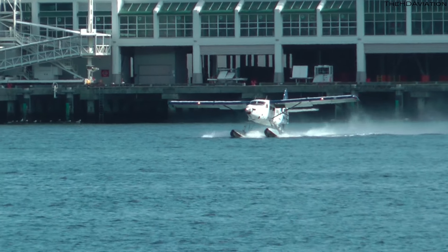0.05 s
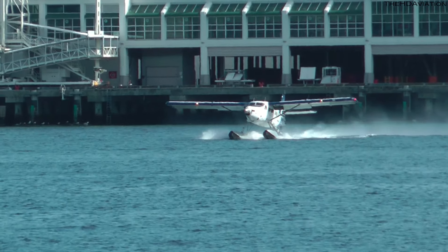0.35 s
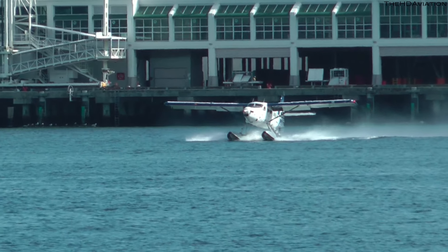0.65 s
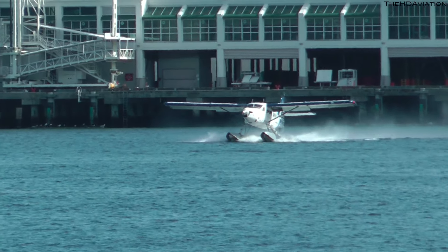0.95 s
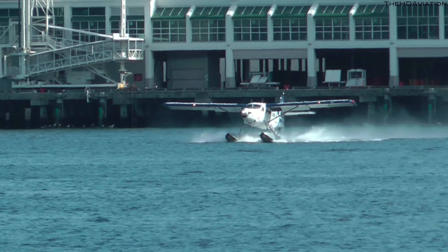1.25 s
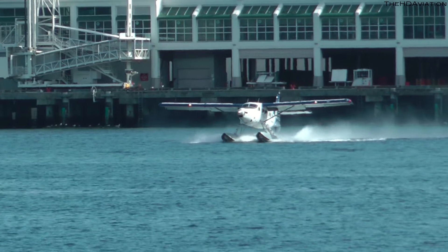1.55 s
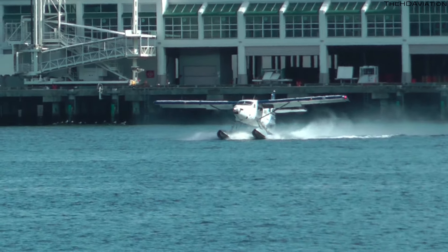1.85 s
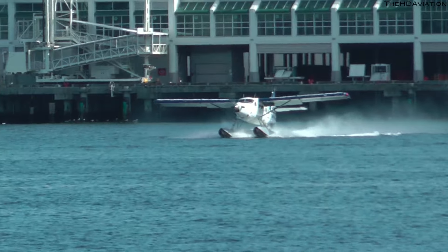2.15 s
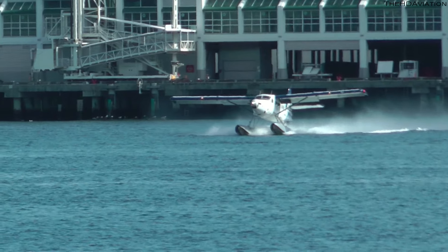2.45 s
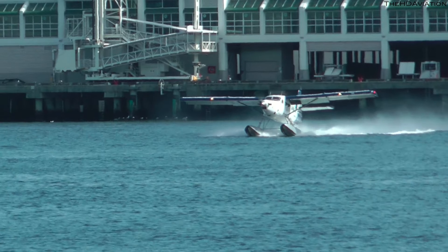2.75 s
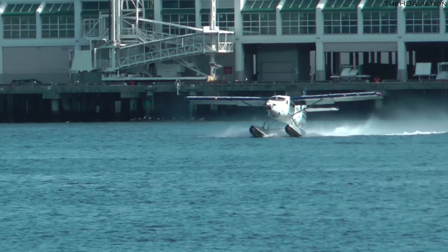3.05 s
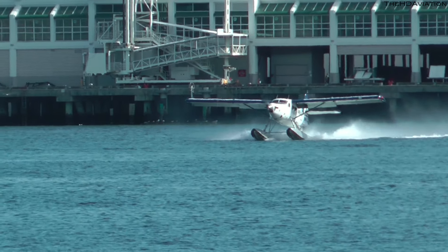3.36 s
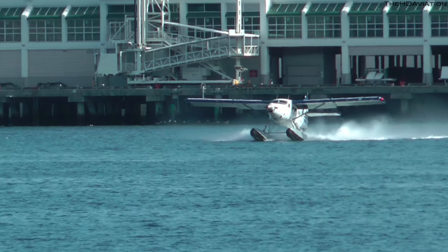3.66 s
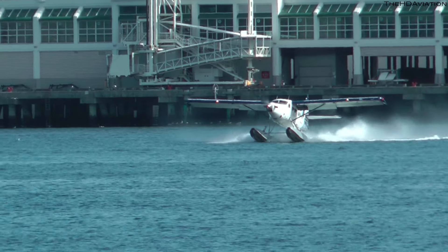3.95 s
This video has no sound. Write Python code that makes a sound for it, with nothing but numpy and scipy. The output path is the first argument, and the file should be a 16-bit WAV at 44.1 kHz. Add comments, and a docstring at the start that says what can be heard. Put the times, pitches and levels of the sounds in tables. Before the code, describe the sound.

A floatplane's propeller drones over a throbbing exhaust rumble throughout, far off and slightly right, with hissing spray, faint fizzing ripples and a low harbour hum. Light handling ticks touch the microphone now and then, the sharpest at about 0.8 seconds. From 1 to 3 seconds the drone wavers and sinks slightly in pitch. From 3 to 4 seconds a high engine whine and the spray grow louder.

```python
"""A floatplane runs across a harbour at take-off power, far off and a little to the right.
From the start its propeller drones over a throbbing exhaust, and the quay sends back a slightly higher
echo; spray hisses, ripples fizz and harbour machines hum. A camera ticks now and then, loudest at 0.8 s.
Through the middle the drone sinks a little in pitch, while its tones swell and fade in turn.
In the last second the engine's whine and the spray grow as the plane nears."""
import sys
import numpy as np
from scipy import signal
from scipy.fft import rfft, irfft
from scipy.io import wavfile

SR = 44100
rng = np.random.default_rng(int(sys.argv[2]) if len(sys.argv) > 2 else 0)


def dump_mix(stems):
    """Bounce the given channels to the path in sys.argv[1] as a 16-bit WAV at rate SR."""
    frames = np.atleast_2d(stems).T  # one column per channel
    limited = np.clip(frames, -1, 1)  # hard clip at full scale
    pcm = np.round(limited * 32767).astype(np.int16)
    wavfile.write(sys.argv[1], SR, pcm)


N = 176400  # 4 seconds

# How often a propeller blade sweeps past: (time [s], rate [Hz])
BLADE_RATE = [(0, 96.8), (.35, 98.07), (.65, 100.2), (1.15, 99.7), (1.6, 99.1), (2.1, 98.4), (2.8, 97.5),
              (4, 97.4)]

def blade_angle():
    """The beat that propeller and exhaust share: one full circle per passing blade, wavering a little."""
    return turning(in_time(BLADE_RATE) + 0.28 * drift(4.4))


# How the drone's lowest, second and third tones swell and fade: (time [s], level [dB])
FIRST_LEVEL = [(0.0, -46), (0.09, -27.5), (0.18, -25.5), (0.33, -33), (0.54, -25.5), (0.6, -37),
               (1.44, -25), (1.8, -55), (1.92, -25.5), (2.13, -24.5), (2.25, -43), (2.46, -21.5),
               (2.61, -44), (2.76, -22.5), (2.91, -43), (3.03, -21.5), (3.21, -39), (3.36, -20),
               (3.45, -31), (3.57, -20), (3.66, -24.5), (3.75, -18.5), (3.84, -24.5), (3.99, -19)]
SECOND_LEVEL = [(0.0, -25), (0.42, -27.5), (0.48, -20), (0.54, -26.1), (0.87, -22.5), (0.93, -30),
                (1.14, -27), (1.26, -45), (1.35, -28.4), (1.83, -32), (1.92, -25.5), (2.49, -35),
                (2.82, -24.5), (3.09, -53), (3.18, -22.5), (3.24, -38), (3.69, -22), (3.99, -55)]
THIRD_LEVEL = [(0.0, -31), (0.3, -25), (0.45, -50), (0.54, -31), (0.63, -30.5), (0.78, -26.5), (0.84, -62),
               (1.11, -46), (1.23, -21.5), (1.56, -19.5), (2.01, -22), (2.64, -18), (2.79, -29.5),
               (3.21, -26.5), (3.33, -22), (3.51, -20.5), (3.63, -26.5), (3.99, -22)]
# The weak tones above them: (multiple of the blade rate [x], level [dB])
OVERTONES = [(4, -38.5), (5, -45.5), (6, -47.5)]
# How far the weak tones are turned up or down: (time [s], boost [dB])
OVERTONE_BOOST = [(0, -9), (1, 0.5), (1.6, 3), (2.6, 5), (3.3, 7.5), (3.7, -1.5), (4, 7.5)]

def propeller(angle):
    """Each blade pushes the air, making tones at 1, 2, 3... times the blade rate. Gusty air shakes them."""
    strong = (strong_tone(angle, FIRST_LEVEL, boost_db=0.04)
              + strong_tone(2 * angle, SECOND_LEVEL, boost_db=-0.77)
              + strong_tone(3 * angle, THIRD_LEVEL, boost_db=-0.23))
    weak = sum(fading_tone(round(multiple) * angle, db, fade_db=4.5) for multiple, db in OVERTONES)
    return (strong + from_db(in_time(OVERTONE_BOOST)) * weak) * pan(-7.5)


# The rumble's mix of low and high sound: (frequency [Hz], relative level [dB])
RUMBLE_COLOUR = [(20, -30.5), (45, -16), (80, -5), (120, -0.5), (155, -3), (240, 0), (350, 0), (460, -1),
                 (590, -3), (660, -13), (840, -14.5), (1050, -22), (1500, -29.5), (2500, -59), (6000, -79)]
# How loud the rumble is: (time [s], level [dB])
RUMBLE_LEVEL = [(0, -27), (.35, -26.5), (.62, -25), (.9, -26.5), (1.3, -26), (1.8, -27), (2.5, -26),
                (2.85, -25.5), (3.25, -25.5), (3.65, -26.5), (4, -25)]
# Where the rumble sits, mostly to the right: (frequency [Hz], left minus right [dB])
RUMBLE_BALANCE = [(40, -8.6), (130, -8), (200, 0.5), (310, -5.5), (420, -10), (550, -6.8), (780, -4.5),
                  (1000, -3.5)]

def exhaust(angle):
    """Rough puffs at the blade rate, smeared into a rumble by distance."""
    level_db = in_time(RUMBLE_LEVEL) + drift(18)  # flutters by about 1 dB
    throb = 1 + 0.31 * np.cos(angle)
    rumble = from_db(level_db) * coloured_noise(RUMBLE_COLOUR, throb)
    hz = np.arange(N // 2 + 1) * SR / N
    return irfft(rfft(rumble) * pan(at_hz(RUMBLE_BALANCE, hz)), N)


# The tones in the echo: (multiple of the echo's base pitch [x], level [dB])
ECHO_TONES = [(1, -39.5), (2, -33.5), (3, -34), (4, -42), (5, -37.5), (6, -44.5), (7, -53), (8, -49),
              (9, -55)]
# How far the echo is turned up or down: (time [s], boost [dB])
ECHO_BOOST = [(0, 0), (.45, 0.5), (1, -1.5), (1.6, 3.5), (2.1, -0.5), (3, -3.5), (4, 2.5)]
ECHO_PITCH_HZ, ECHO_WAVER_HZ = 100.9, 0.363

def quay_echo():
    """The plane's motion shifts the echo's pitch differently, so it pulses against the direct drone."""
    angle = turning(ECHO_PITCH_HZ + ECHO_WAVER_HZ * drift(2.5))
    drone = sum(fading_tone(round(multiple) * angle, db, fade_db=2.4) for multiple, db in ECHO_TONES)
    return from_db(in_time(ECHO_BOOST)) * drone * pan(-7)


# The bands of the engine's high whine: (frequency [Hz], width [Hz], relative level [dB])
WHINE_BANDS = [(2124, 230, 3), (3070, 290, -1.5), (4104, 440, 0)]
# How loud the whine is: (time [s], level [dB])
WHINE_LEVEL = [(0, -53), (1.2, -55.5), (2.8, -54), (3.35, -50), (3.65, -46), (4, -39)]

def engine_whine():
    """Narrow bands of rushing air, blurred by distance, that come forward as the plane nears."""
    bands = sum(from_db(db) * rms_one(narrow_band(rng.standard_normal(N), hz, width_hz))
                for hz, width_hz, db in WHINE_BANDS)
    return from_db(in_time(WHINE_LEVEL)) * rms_one(bands) * pan(-0.8)


# The spray's mix of low and high sound: (frequency [Hz], relative level [dB])
SPRAY_COLOUR = [(600, -5), (1100, -10), (1440, -5.5), (1600, -11.5), (1730, -0.5), (1860, 0.5), (1970, -2),
                (2070, -1.5), (2330, -1.5), (2520, -6.5), (2830, -4.5), (3400, -8.5), (4000, -10),
                (5000, -16), (6300, -22), (8000, -31.5), (15000, -38)]
# How loud the spray is: (time [s], level [dB])
SPRAY_LEVEL = [(0, -42), (.8, -40.5), (1.9, -40.5), (2.7, -41.5), (3.35, -40.5), (3.6, -41), (3.8, -39.5),
               (4, -37.5)]

def spray():
    """Water thrown up behind the plane hisses, growing as the plane nears."""
    level_db = in_time(SPRAY_LEVEL) + 0.4 * drift(19)
    return from_db(level_db) * coloured_noise(SPRAY_COLOUR) * pan(-0.8)


# The tones of the harbour machines: (pitch [Hz], level [dB])
HUM_TONES = [(42, -46.5), (113, -39.5), (165, -41)]

def harbour_hum():
    """Machines along the shore hum on low, steady notes, off to the right."""
    hum = sum(fading_tone(turning(np.full(N, hz)), db, fade_db=-1.5) for hz, db in HUM_TONES)
    return hum * pan(-11)


# The fizz's mix of low and high sound: (frequency [Hz], relative level [dB])
FIZZ_COLOUR = [(3000, -11), (5500, 9.5), (7000, 5.5), (8500, -1), (9800, -0.5), (11500, -7), (14500, -4.5),
               (16000, -14.5)]
# How loud the fizz is: (time [s], level [dB])
FIZZ_LEVEL = [(0, -60), (.7, -63.5), (1.1, -59.5), (1.7, -61), (2.1, -58), (2.65, -57), (3.35, -58),
              (3.55, -66), (4, -63)]
DROPS_PER_S, DROP_SPREAD_DB, DROP_CYCLES = 180, 3.0, 7

def ripples():
    """Nearby ripples make a fine fizz, dotted with tiny droplets that each ring for a few cycles."""
    pitches = np.geomspace(5000, 11500, 12)
    sizes = from_db(DROP_SPREAD_DB * np.minimum(rng.exponential(1, N), 4))  # many small, few big
    signs = rng.choice([-1, 1], N)
    clicks = sizes * signs * (rng.random(N) < DROPS_PER_S / SR)
    pitch_choice = rng.integers(0, len(pitches), N)
    drops = sum(resonate(clicks * (pitch_choice == k), hz, 2 * hz / DROP_CYCLES) / hz
                for k, hz in enumerate(pitches))
    fizz = coloured_noise(FIZZ_COLOUR) + from_db(-8.5) * rms_one(drops)
    return from_db(in_time(FIZZ_LEVEL)) * fizz


# Touches on the camera: (time [s], relative level [dB], fade time [s], frequency [Hz], width [Hz])
TICKS = [(0.16, -44, .012, 7450, 2500), (.528, -44, 0.0054, 7200, 2000), (.771, -41, 0.0054, 6500, 3000),
         (0.806, -29, 0.0022, 6400, 6000), (0.8105, -19.5, 0.0027, 4600, 1980),
         (.826, -43, 0.014, 6900, 3000), (.850, -28, 0.0018, 5100, 1600), (.870, -47, 0.0037, 10000, 3000),
         (1.065, -43, .005, 7000, 2500), (1.131, -48, .004, 9000, 3000), (2.015, -39, 0.0041, 8000, 4000),
         (2.086, -40, 0.0034, 6500, 2000), (2.642, -41, .004, 7200, 2000), (3.610, -40, .003, 5600, 1500),
         (3.746, -35, .003, 4800, 900)]
SNAP_SHARE = 0.6  # the part of a touch's energy that goes into its first snap

def camera_ticks():
    """Each tick is a snap and a brief scuff of plastic, which also makes the case ring."""
    ticks = np.zeros(N)
    t = np.arange(N) / SR
    for start, db, fade_s, hz, width_hz in TICKS:
        dying_away = (t >= start) * np.exp(-np.abs(t - start) / fade_s)
        touch = np.sqrt(1 - SNAP_SHARE) * rng.standard_normal(N) * dying_away  # the scuff
        touch[int(start * SR)] += np.sqrt(SNAP_SHARE * fade_s * SR / 2)  # the snap
        make_up = np.sqrt(SR / 2 / width_hz)  # a narrower band lets less through, so turn it up
        ticks += from_db(db - 9) * narrow_band(touch, hz, width_hz) * make_up
    case_ring = from_db(-7) * resonate(ticks, hz=9950, width_hz=400)
    return (ticks + case_ring) * pan(-2.5)


# How alike the two ears hear a noise: (frequency [Hz], likeness [0 to 1])
LIKENESS = [(60, 0.86), (300, 0.87), (650, 0.74), (1400, 0.84), (2000, 0.96), (4000, 1), (6000, .999)]

def coloured_noise(colour, pulsing=1):
    """Stereo noise, pulsed if asked, then given its mix of low and high sound."""
    hz = np.arange(N // 2 + 1) * SR / N
    middle, side = rfft(rng.standard_normal((2, N)) * pulsing) * from_db(at_hz(colour, hz))
    alike = np.clip(at_hz(LIKENESS, hz), 0, 1)
    middle = irfft(middle, N)  # what both ears share
    side = irfft(side * np.sqrt((1 - alike) / (1 + alike)), N)  # what sets them apart
    return (middle + side * [[1], [-1]]) / middle.std()


def strong_tone(angle, levels, boost_db):
    """One tone of the drone, following its table of levels and shaken a little by the air."""
    phase = rng.uniform(0, 2 * np.pi) + 0.24 * drift(4)
    swell = in_time([(time, from_db(db)) for time, db in levels])
    flutter = from_db(boost_db - 0.07 * drift(24))
    return swell * flutter * np.sqrt(2) * np.cos(angle + phase)


def fading_tone(angle, db, fade_db):
    """A tone whose strength and timing wander on the way over the water."""
    wave = np.cos(angle + rng.uniform(0, 2 * np.pi) + 0.66 * drift(4.5))
    return from_db(db) * rms_one(wave * from_db(fade_db * drift(2.73)))


def drift(rate):
    """A smooth random wobble, about 1 in size; a higher rate wobbles faster."""
    r = np.exp(-200 * np.pi * rate / SR)
    noise = rng.standard_normal(N // 100 + 1002)  # one value per 100 samples, plus a run-up
    slow = signal.lfilter([1], [1, -2 * r, r * r], noise)[1000:]
    return np.interp(np.linspace(0, len(slow) - 1, N), np.arange(len(slow)), rms_one(slow - slow.mean()))


def resonate(x, hz, width_hz):
    """Make a sound ring at one pitch; the smaller the width, the longer it rings."""
    r = np.exp(-np.pi * width_hz / SR)
    feed_in = np.array([1, 0, -1]) * (1 - r * r) / 2
    feedback = [1, -2 * r * np.cos(2 * np.pi * hz / SR), r * r]
    return signal.lfilter(feed_in, feedback, x + 1e-18)


def narrow_band(x, hz, width_hz):
    """Keep the sound near one pitch by passing it through two ringing filters."""
    return resonate(resonate(x, hz, width_hz), hz, 2 * width_hz)


def pan(left_minus_right_db):
    """Left and right volumes that average 1; below 0 dB the sound moves to the right."""
    gains = from_db(np.array([[.5], [-.5]]) * left_minus_right_db)
    return gains / gains.mean(axis=0)


def turning(hz):
    """The growing angle of something that goes round hz times a second."""
    return 2 * np.pi * np.cumsum(hz) / SR


def in_time(rows):
    """Join a table's points with straight lines, giving a value for every sample."""
    return np.interp(np.arange(N) / SR, *np.transpose(rows))


def at_hz(rows, hz):
    """Read a table between its frequencies, giving each octave equal room."""
    frequencies, values = np.transpose(rows)
    return np.interp(np.log(hz + 1e-3), np.log(frequencies), values)


def from_db(db):
    """Turn decibels into a number to multiply by."""
    return 10 ** (np.asarray(db) / 20)


def rms_one(x):
    """Scale a signal so that its average strength (rms) is 1."""
    return x / np.sqrt(np.mean(x ** 2) + 1e-20)


def scene():
    """Plane, water, harbour and camera together."""
    angle = blade_angle()
    plane = propeller(angle) + exhaust(angle) + engine_whine() + quay_echo()
    return plane + spray() + ripples() + harbour_hum() + camera_ticks()


CUTOFF_HZ = 15400

def record(dry):
    """Cut away the very highest treble."""
    return signal.sosfilt(signal.ellip(10, .1, 80, CUTOFF_HZ, fs=SR, output="sos"), dry)


dry = scene()
out = record(dry)
dump_mix(out)
```